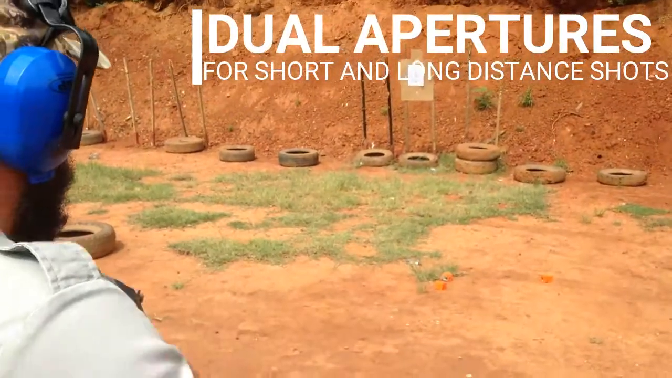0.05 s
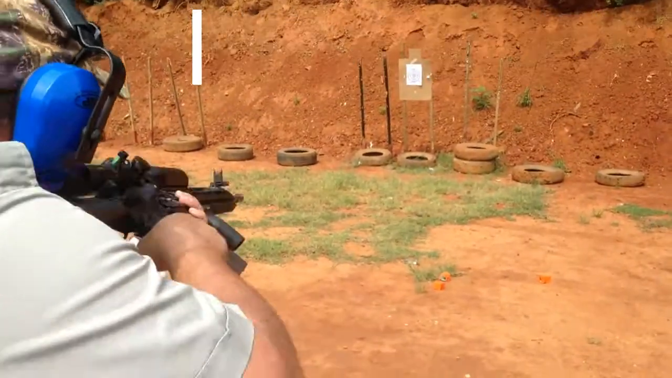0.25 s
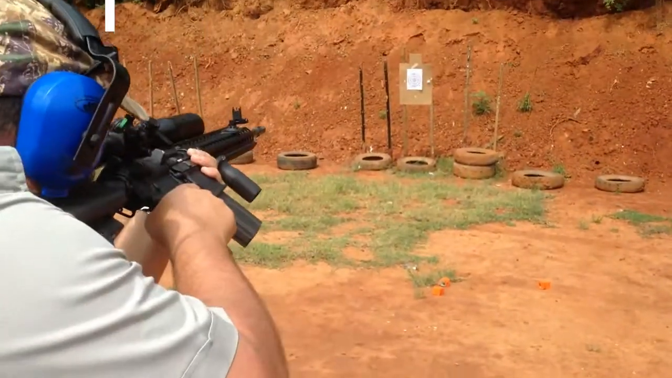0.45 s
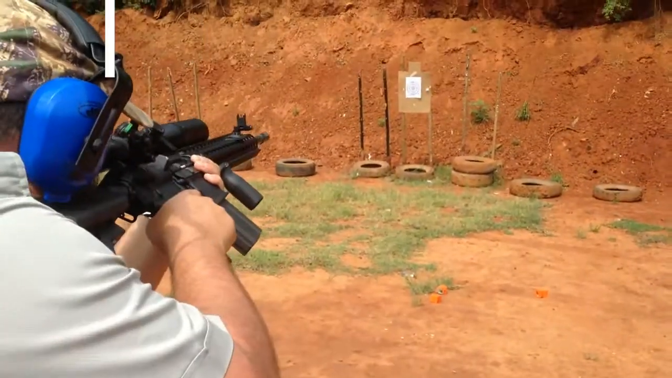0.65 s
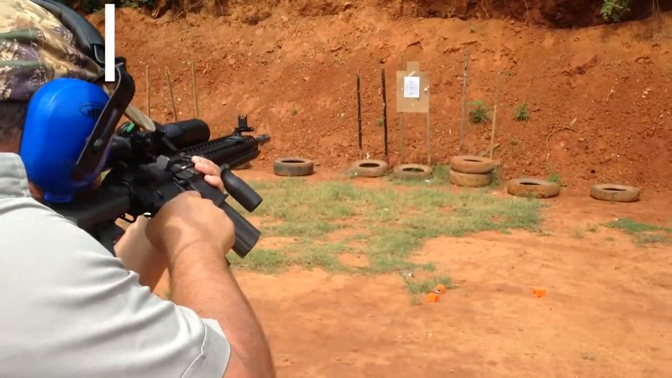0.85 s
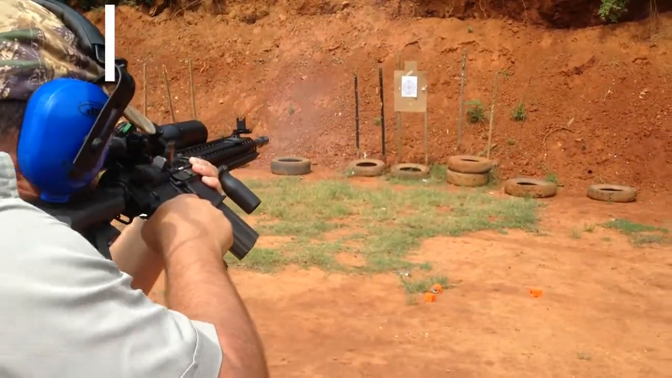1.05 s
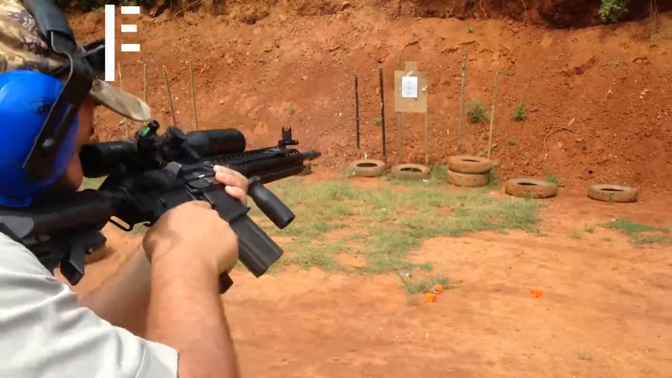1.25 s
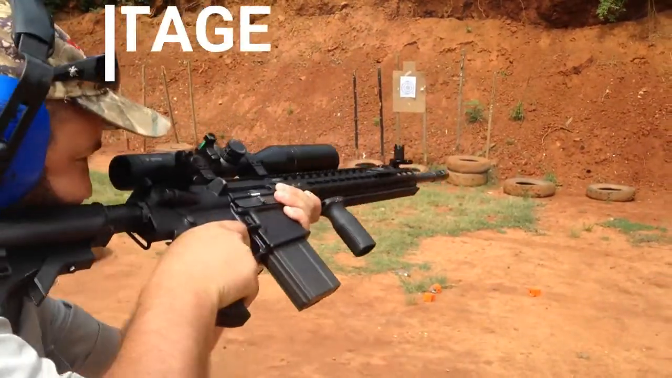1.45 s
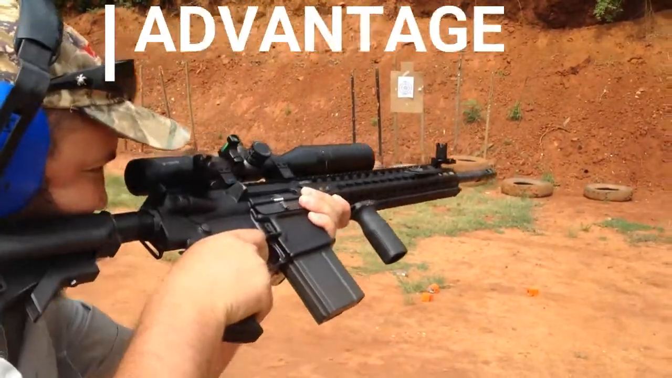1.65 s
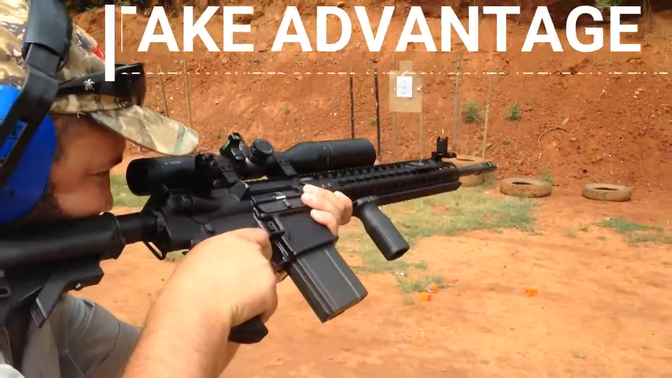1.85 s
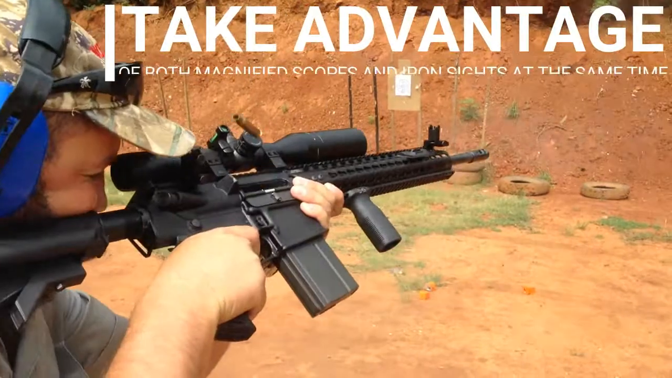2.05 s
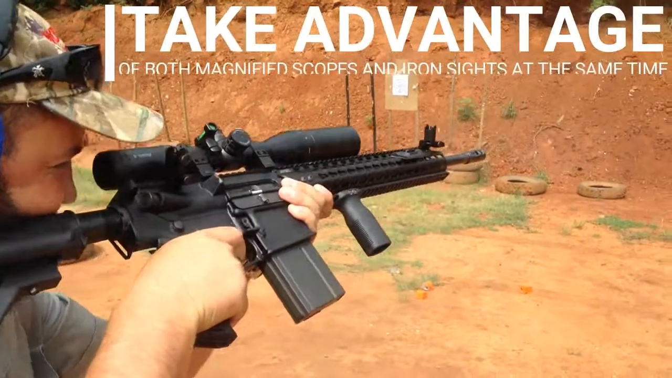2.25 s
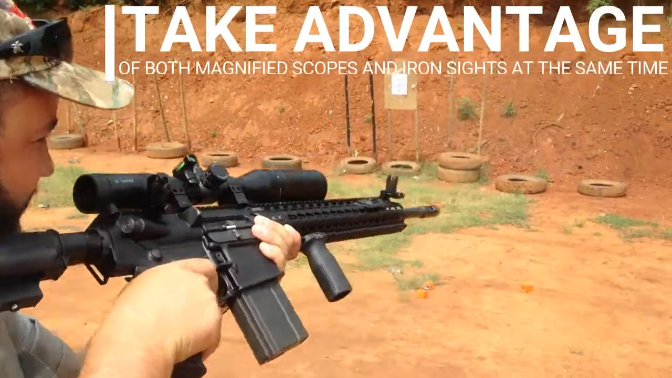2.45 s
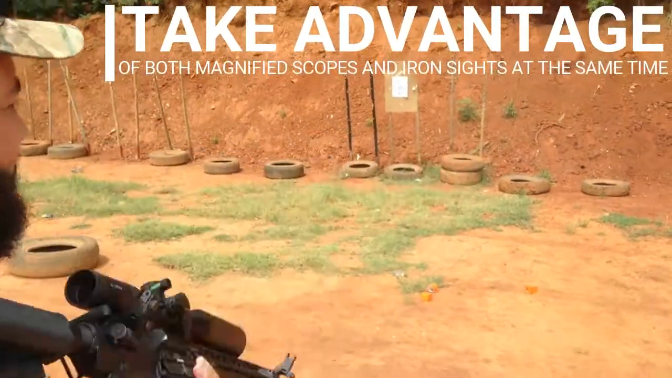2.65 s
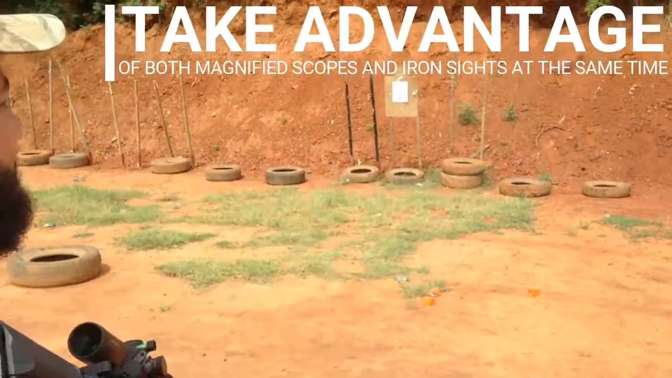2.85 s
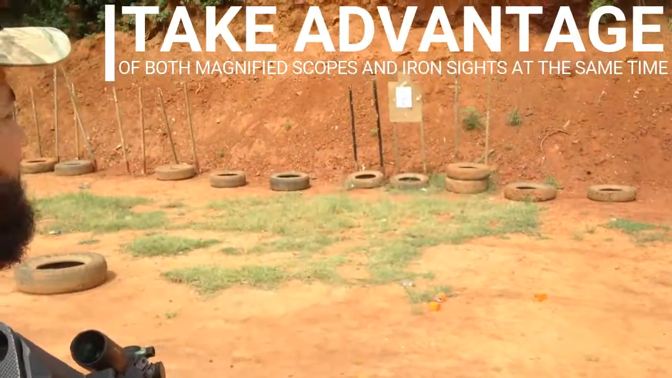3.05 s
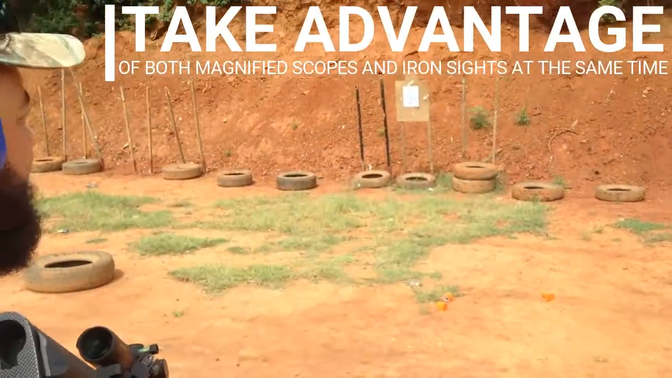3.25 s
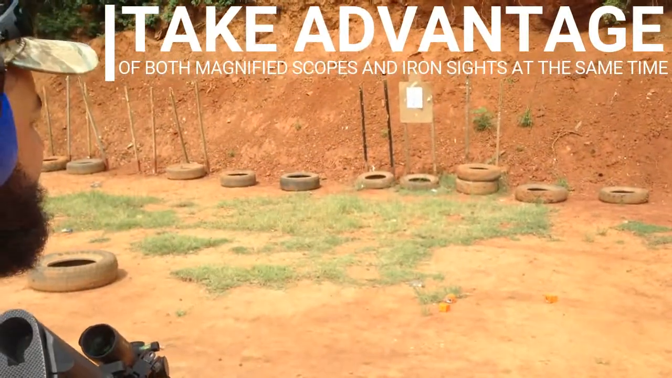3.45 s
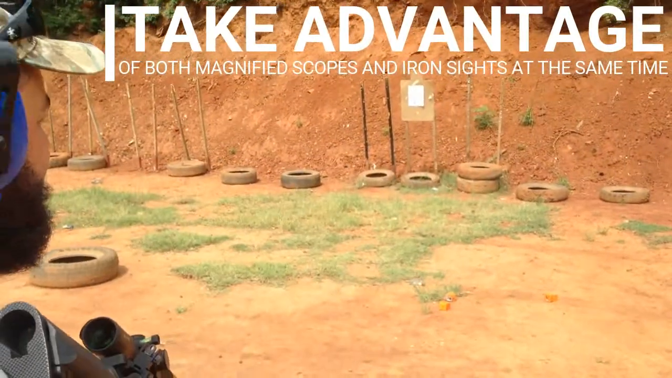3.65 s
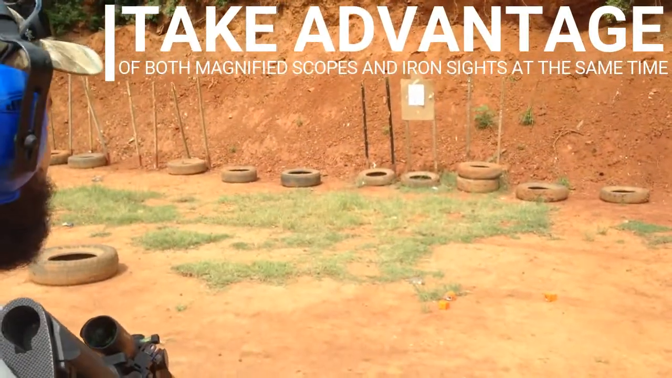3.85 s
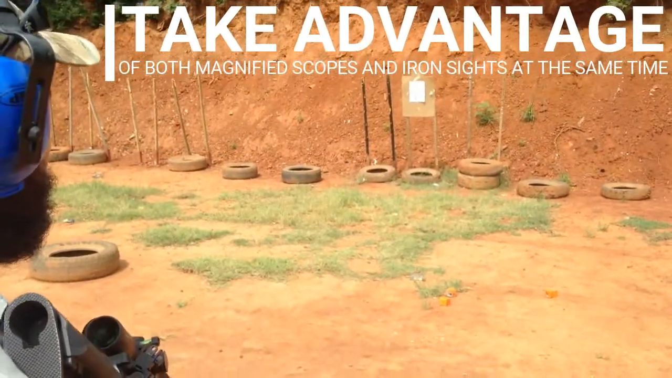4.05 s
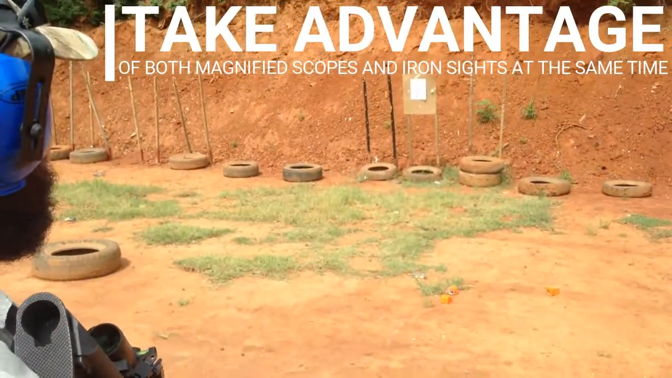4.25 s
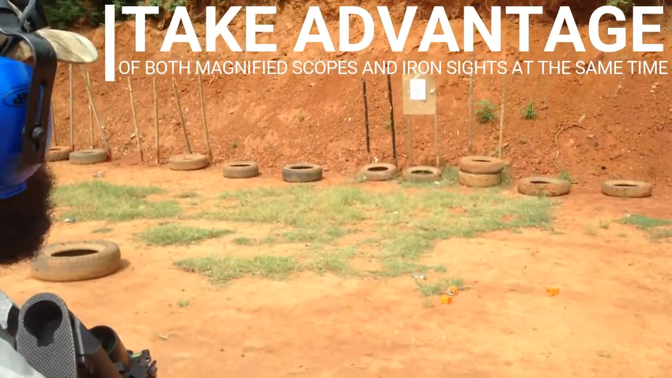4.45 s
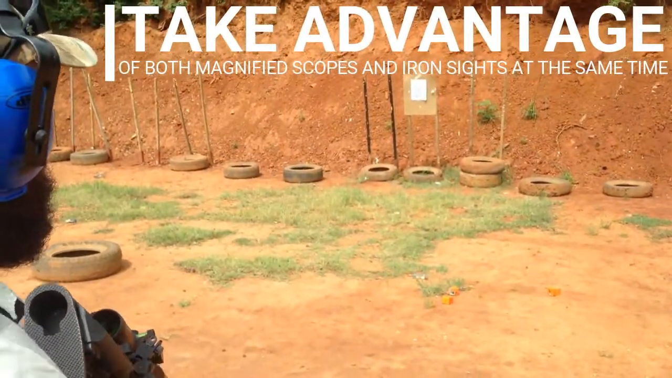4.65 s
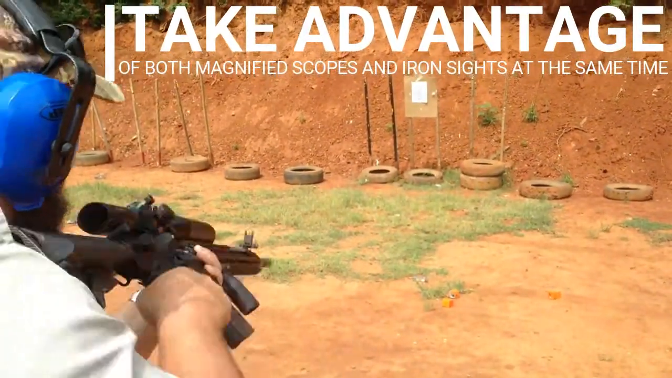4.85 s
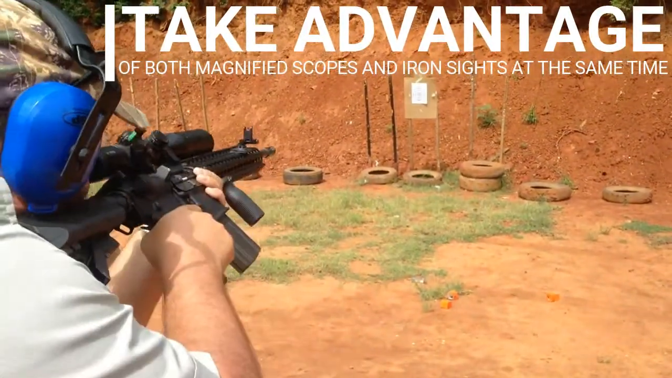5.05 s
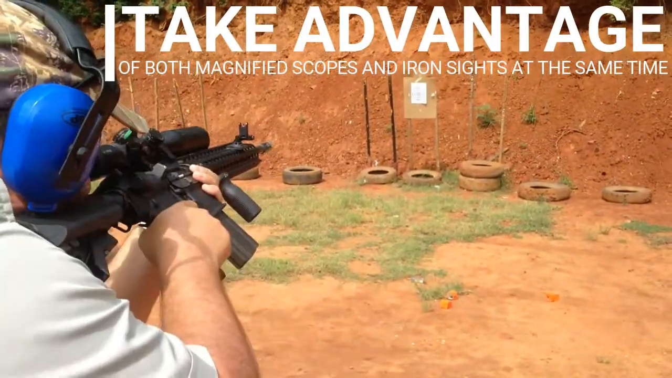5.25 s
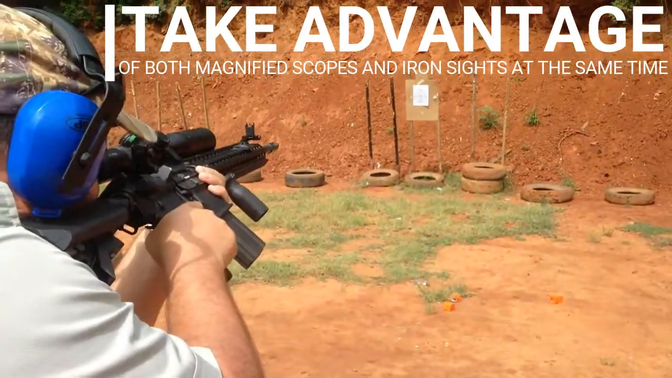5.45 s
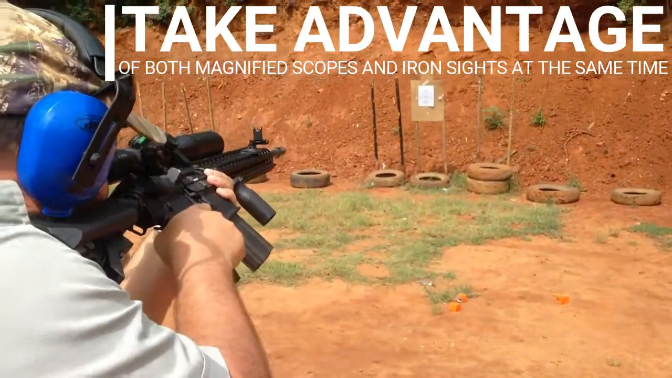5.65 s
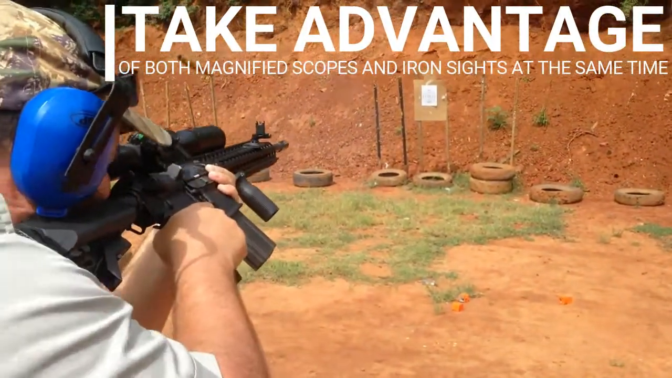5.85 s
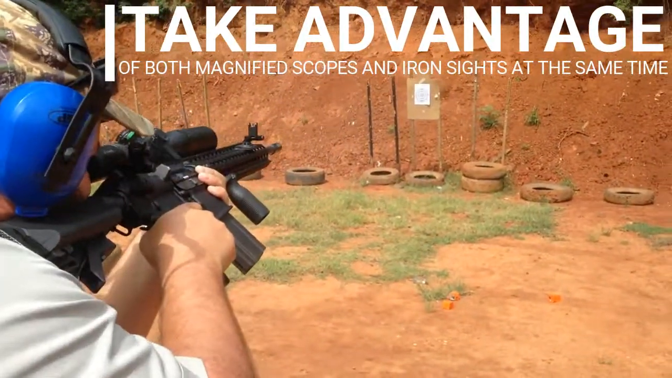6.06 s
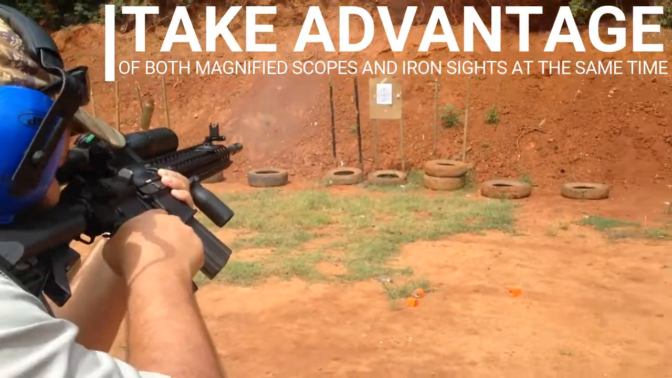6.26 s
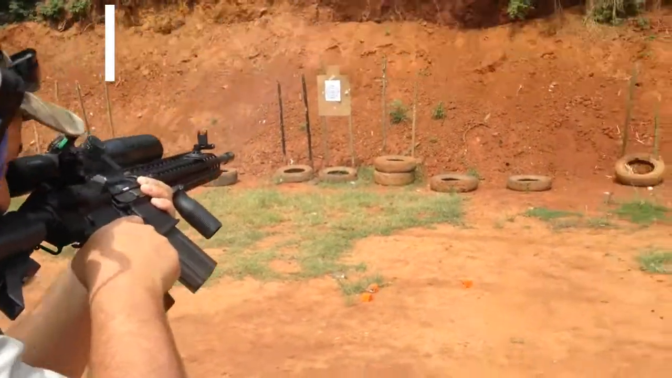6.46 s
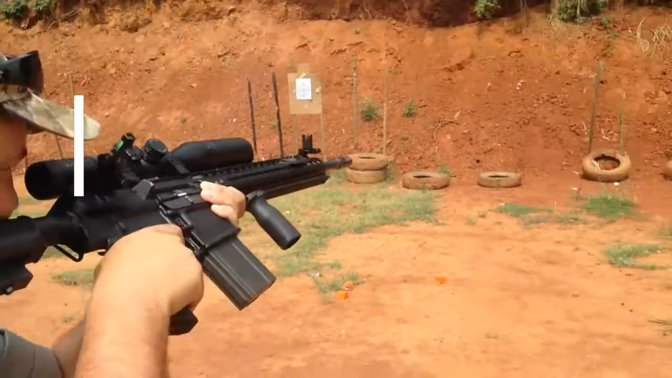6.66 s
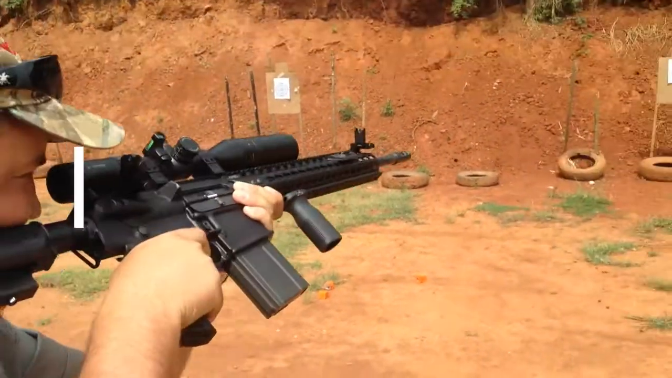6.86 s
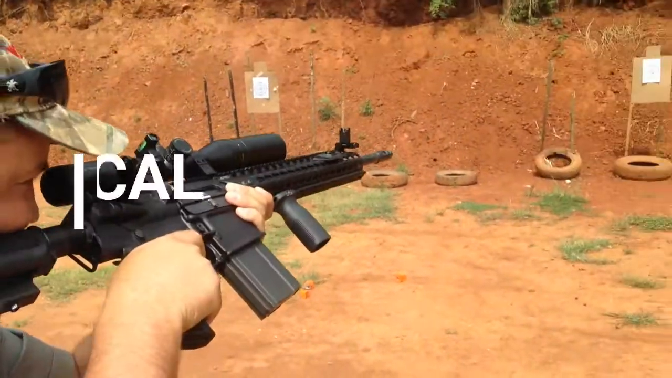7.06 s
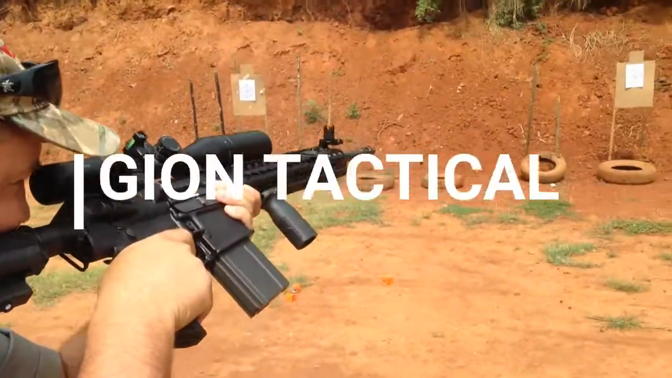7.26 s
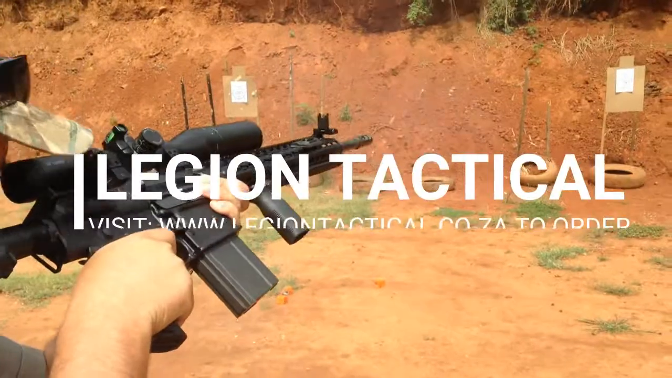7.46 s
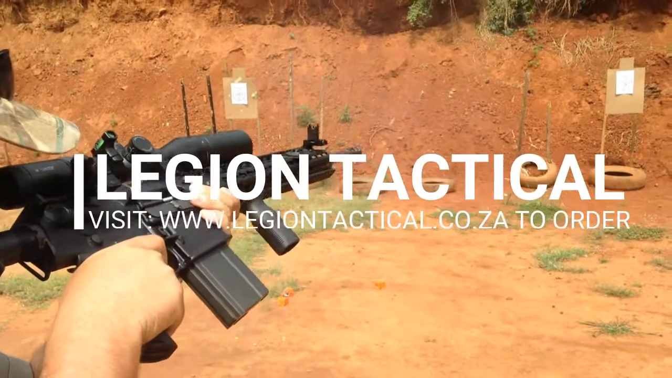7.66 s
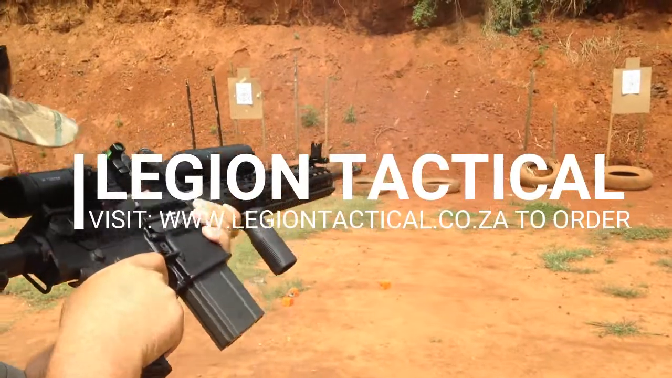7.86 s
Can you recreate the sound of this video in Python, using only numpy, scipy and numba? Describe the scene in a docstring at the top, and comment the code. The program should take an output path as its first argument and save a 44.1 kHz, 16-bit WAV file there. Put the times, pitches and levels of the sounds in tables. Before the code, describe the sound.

At an open-air rifle range ringed by earth banks, heard right beside the shooter, two hard shots crack about a second apart, each followed by a dense splash of reflections and a faint far echo. Ringing brass, heavy knocks, rubbing cloth and wind thumps fill a pause. Then two quick shots follow, and a last one a second later. The overloaded microphone flattens each blast.

```python
"""An outdoor rifle range with earth banks, heard from beside the shooter: steady air and breeze, both filtered noise.
Sleeves rub, the rifle scuffs and clacks (noise bursts), air puffs push the microphone, a far bird whistles (gliding sines).
Five shots follow: a noise crack, dense scatter from the banks and a far echo half a second later.
A limiter flattens the loud beginning of each shot; the scatter and far echo then fade freely.
After the second shot come ringing brass cases (decaying sines), hard knocks, gusts and a soft rush."""
import sys
import numpy as np
from scipy import signal
from scipy.fft import rfft, irfft, next_fast_len
from scipy.io import wavfile
from scipy.ndimage import uniform_filter1d
from numba import njit

SR = 44100
rng = np.random.default_rng(int(sys.argv[2]) if len(sys.argv) > 2 else 0)


def to_wav(sig):
    """Store sig (one row per channel, or 1-D mono) as 16-bit WAV at the path in sys.argv[1].

    Samples outside -1..1 are clipped; the rate is SR.
    """
    pcm = np.clip(np.atleast_2d(sig), -1, 1) * 32767
    pcm = np.round(pcm).astype(np.int16)
    wavfile.write(sys.argv[1], SR, pcm.T)  # frames by channels


N = 348654
TIME = np.arange(N) / SR


def undb(db):
    """Decibels to amplitude gain."""
    return 10 ** (np.asarray(db) / 20)


def over_hz(table, hz):
    """Read a table of (Hz, value) on a log-frequency axis."""
    points_hz, values = np.transpose(table)
    return np.interp(np.log(np.maximum(hz, 1)), np.log(points_hz), values)


def colour(x, spectrum):
    """Give a noise a spectrum, at rms 1; the bass rolls off below the first point."""
    size = next_fast_len(len(x), True)
    hz = np.fft.rfftfreq(size, 1 / SR)
    bass_gain = np.minimum(hz / spectrum[0][0], 1) ** 2
    gain = undb(over_hz(spectrum, hz)) * bass_gain
    y = irfft(rfft(x, size) * gain, size)[:len(x)]
    return y / y.std()


def walk(rate_hz, size):
    """Smooth random wandering with a standard deviation of 1."""
    step = int(SR / rate_hz)
    stairs = np.repeat(rng.standard_normal(size // step + 1), step)
    y = uniform_filter1d(stairs, step)[:size]
    return y / y.std()


def reflections(size, patchy_db=1.5):
    """Dense noise, as of crowded echoes, whose level clusters randomly."""
    return rng.standard_normal(size) * undb(patchy_db * walk(700, size))


def swell(t, start_s, end_s, rise_db_per_s, fall_db_per_s):
    """Gain that rises to 1 at the start, holds until the end and falls away."""
    early_s = np.maximum(start_s - t, 0)
    late_s = np.maximum(t - end_s, 0)
    return undb(-rise_db_per_s * early_s - fall_db_per_s * late_s)


def add(out, s, x):
    """Mix a sound in at a time in seconds."""
    i = int(s * SR)
    out[i:i + len(x)] += x[:len(out) - i]


# Gusts at the microphone. Each row: start in seconds, end in seconds, level in dB.
GUST_TIMES = [(2.75, 4.3, -46), (4.664, 5.4, -50), (5.687, 5.72, -54.5), (7.8, 7.9, -52.5)]
BREEZE_DB, GUST_RISE_DB_PER_S, GUST_FALL_DB_PER_S = -64, 133, 127


def gusts(t):
    """Strength of the wind: a light breeze with gusts on top."""
    strength = undb(BREEZE_DB)
    for start_s, end_s, db in GUST_TIMES:
        strength = strength + undb(db) * swell(t, start_s, end_s, GUST_RISE_DB_PER_S, GUST_FALL_DB_PER_S)
    return strength


# Spectrum of the open air. Each row: frequency in Hz, relative level in dB per Hz.
AIR_SPECTRUM = [(60, -5.5), (130, -11), (250, -11), (380, -11.5), (560, -12.5), (900, -9.5), (2200, -6),
                (3000, -11), (5500, -15), (9000, -22), (15000, -26)]
AIR_DB = -66
# Spectrum of the soft rush. Each row: frequency in Hz, relative level in dB per Hz.
RUSH_SPECTRUM = [(200, -11), (400, 1), (650, 4), (1000, -2.5), (1500, -5), (2200, -8), (3000, -24),
                 (6000, -30), (10000, -33.5), (15000, -42)]
# one swell of rush while the rifle is held low, over a faint remainder
RUSH_START_S, RUSH_END_S, RUSH_DB, RUSH_REST_DB = 3.1, 4.375, -47, -67
RUSH_RISE_DB_PER_S, RUSH_FALL_DB_PER_S = 22.5, 39.5
# Spectrum of the low eddies. Each row: frequency in Hz, relative level in dB per Hz.
EDDY_SPECTRUM = [(30, -14.5), (62, 4), (120, -4.5), (220, -17.5), (400, -34.5), (1500, -70.5), (5000, -91)]


def wind(gusty_db=2.0, flutter_db=1.5):
    """Noise of steady air, low eddies at the microphone that follow the gusts, and a fluttering rush."""
    air = colour(rng.standard_normal(N), AIR_SPECTRUM) * undb(AIR_DB + 0.54 * walk(3.2, N))
    eddies = colour(rng.standard_normal(N), EDDY_SPECTRUM) * gusts(TIME) * undb(gusty_db * walk(12, N))
    rush_swell = swell(TIME, RUSH_START_S, RUSH_END_S, RUSH_RISE_DB_PER_S, RUSH_FALL_DB_PER_S)
    rush_gain = undb(RUSH_REST_DB) + undb(RUSH_DB) * rush_swell
    rush = colour(reflections(N, patchy_db=2), RUSH_SPECTRUM) * rush_gain
    return air + eddies + rush * undb(flutter_db * walk(30, N))


# Spectrum of rubbed cloth. Each row: frequency in Hz, relative level in dB per Hz.
CLOTH_SPECTRUM = [(1500, -7), (3500, -1), (6500, 3), (10000, -4), (15000, -11.5)]
# Movements of the shooter. Each row: start in seconds, end in seconds, level in dB.
ARM_MOVES = [(0.052, .25, -70.5), (1.9, 3.554, -60.5), (4.85, 5.2, -71.5)]
MOVE_RISE_DB_PER_S, MOVE_FALL_DB_PER_S = 39, 35


def sleeves(catch_db=1.0):
    """Cloth hiss that catches and slips: patchy noise under a randomly wandering level."""
    rubbing = np.zeros(N)
    for start_s, end_s, db in ARM_MOVES:
        rubbing += undb(db) * swell(TIME, start_s, end_s, MOVE_RISE_DB_PER_S, MOVE_FALL_DB_PER_S)
    hiss = colour(reflections(N, patchy_db=2.5), CLOTH_SPECTRUM)
    return hiss * rubbing * undb(catch_db * walk(45, N))


def contact(db, centre_hz, octaves, decay_s):
    """A short contact: a decaying noise burst in one broad resonance."""
    t = TIME[:SR // 5]
    hz = np.maximum(np.fft.rfftfreq(len(t), 1 / SR), 1)
    resonance = 1 / (1 + (np.log2(hz / centre_hz) / octaves) ** 4)
    body = irfft(rfft(rng.standard_normal(len(t))) * resonance, len(t))
    return undb(db) * .5 * body / body.std() * np.exp(-t / decay_s)


# Rifle against clothing. Each row: time in seconds, level in dB, centre in Hz, decay in seconds.
CLOTHING_SCUFFS = [(.17, -51.5, 2180, .04), (3.09, -26, 624, 0.012), (3.141, -32.5, 726, .014),
                   (3.42, -28.5, 645, 0.031), (4.056, -35, 603, 0.06), (4.73, -46, 1420, 0.046)]
SCUFF_OCTAVES = 0.5
# Clacks of the rifle's parts. Each row: time in seconds, level in dB, centre in Hz.
RIFLE_CLACKS = [(.27, -41, 1480), (2.328, -12.5, 4900), (2.6456, -8.5, 1200), (2.663, -17.5, 3950),
                (3.513, -25.5, 1640), (3.763, -38, 895), (4.025, -38, 1860), (4.773, -36, 2100),
                (4.881, -43, 2300), (7.375, -12.5, 1420)]
CLACK_OCTAVES, CLACK_DECAY_S = 0.72, 0.0031
# A case skipping over grit. Each row: time in seconds, level in dB.
GRIT_TICKS = [(3.512, -24), (3.639, -33.5), (3.818, -38), (4.181, -42)]
TICK_HZ, TICK_OCTAVES, TICK_DECAY_S = 5300, .48, 0.0017


def clicks():
    """The rifle scuffs against clothing, its parts clack and a case skips over grit: short noise contacts."""
    out = np.zeros(N)
    for s, db, hz, decay_s in CLOTHING_SCUFFS:
        add(out, s, contact(db, hz, SCUFF_OCTAVES, decay_s))
    for s, db, hz in RIFLE_CLACKS:
        add(out, s, contact(db, hz, CLACK_OCTAVES, CLACK_DECAY_S))
    for s, db in GRIT_TICKS:
        add(out, s, contact(db, TICK_HZ, TICK_OCTAVES, TICK_DECAY_S))
    return out


# Hardest knocks and puffs on the microphone. Each row: time in seconds, push peak in dB, frequency in Hz.
HARD_BUMPS = [(2.6458, -10, 603), (2.65, -5, 437), (2.78, -20, 128), (2.793, -17.5, 147),
              (2.953, -21.5, 132), (2.985, -25.5, 80), (3.214, -19, 113), (3.831, -21.5, 120),
              (3.84, -21, 260), (4.098, -28, 148), (4.118, -23, 110), (4.236, -20, 158), (4.33, -26, 99.5),
              (4.714, -34, 110), (4.91, -33, 101), (4.965, -31, 79.6)]
# lighter puffs come by chance and grow with the gusts
PUFFS_PER_S, PUFF_HZ, PUFF_OVER_GUST_DB = 9.7, 123, 7.5
# Spectrum of scuffing on the microphone. Each row: frequency in Hz, relative level in dB per Hz.
MIC_SCUFF_SPECTRUM = [(90, -2.5), (250, 2.5), (450, -15), (1000, -30), (5000, -53)]


def bumps(scuff_db=-13, scuff_s=0.0055, scatter_db=6.0, scatter_octaves=0.21):
    """A single push on the diaphragm with a swing back on either side, and a little scuffing around it."""
    out = np.zeros(N)
    t = TIME[:SR // 5] - .1
    pushes = [(s, undb(db), hz) for s, db, hz in HARD_BUMPS]
    slots_s = np.arange(.2, TIME[-1], 1 / PUFFS_PER_S)
    for s in slots_s + rng.random(len(slots_s)) / PUFFS_PER_S:
        if s < TIME[-1]:
            size = gusts(s) * undb(PUFF_OVER_GUST_DB + scatter_db * rng.normal())
            pushes.append((s, size, PUFF_HZ * 2 ** (scatter_octaves * rng.normal())))
    for s, size, hz in pushes:
        scuff = colour(rng.standard_normal(len(t)), MIC_SCUFF_SPECTRUM) * np.exp(-abs(t) / scuff_s)
        u = (np.pi * hz * t) ** 2
        push = (2 * u - 1) * np.exp(-np.minimum(u, 50))
        add(out, s + t[0], size * (push + undb(scuff_db) * scuff))
    return out


# Bird whistles. Each row: start in seconds, length in seconds, start, middle and end pitch in Hz, level in dB.
BIRD_WHISTLES = [(.75, .12, 3700, 3930, 3580, -71), (4.514, 0.2, 5500, 4950, 4630, -73),
                 (4.95, 0.076, 3700, 3350, 3050, -65), (5.157, 0.11, 5060, 3950, 3030, -68)]


def bird(waver_db=3.0):
    """Thin whistles from the trees: sines gliding along a parabola in pitch, wavering in strength."""
    out = np.zeros(N)
    for s, length_s, *pitches_hz, db in BIRD_WHISTLES:
        u = np.linspace(0, 1, int(length_s * SR))
        hz = np.polyval(np.polyfit([0, .5, 1], pitches_hz, 2), u)
        envelope = np.sqrt(abs(np.sin(np.pi * u)))
        add(out, s, undb(db) * envelope * np.sin(2 * np.pi * np.cumsum(hz) / SR))
    return out * undb(waver_db * walk(60, N))


def die_away(x, t60_table):
    """Let every octave of a sound fade at its own rate."""
    hz = np.fft.rfftfreq(len(x), 1 / SR)
    t, whole = TIME[:len(x)], rfft(x)
    octave = np.log2(np.clip(hz, 32, 16384))
    out = np.zeros(len(x))
    for k in range(5, 15):
        band = irfft(whole * np.maximum(1 - abs(octave - k), 0), len(x))
        out += band * np.exp(-np.log(1000) * t / over_hz(t60_table, 2 ** k))
    return out


# Bands stressed by the hollow of the range. Each row: centre in Hz, width in Hz, boost in dB.
HOLLOW_BANDS = [(304, 23, 1), (450, 39, 2.5), (515.4, 46, 4), (586, 91, 2.5), (778, 37, 6), (1070, 77, 1),
                (2170, 81, 1)]


def hollow(x):
    """Stress the bands in which the earth banks ring."""
    hz = np.fft.rfftfreq(len(x), 1 / SR)
    boost_db = sum(db / (1 + (2 * (hz - centre) / width) ** 2) for centre, width, db in HOLLOW_BANDS)
    return irfft(rfft(x) * undb(boost_db), len(x))


# Shots. Each row: time in seconds, gain of crack and banks in dB, gain of far echo in dB.
RIFLE_SHOTS = [(1.1105, 4.5, -1), (2.079, 5, -0.5), (5.854, 4.5, 0), (6.2948, 3.5, -1), (7.405, 5, -0.5)]
# Spectra of crack, banks, far echo and the faint noise before them.
# Each row: frequency in Hz, relative level in dB per Hz.
CRACK_SPECTRUM = [(30, -22), (70, -12.5), (200, -7.5), (550, 3), (1000, -3), (2200, 4), (3000, -4.5),
                  (5000, -6), (8000, -8.5), (11000, -14.5), (15000, -13)]
BANKS_SPECTRUM = [(25, -23.5), (45, -11), (100, -11.5), (170, -8.5), (370, -6.5), (540, -0.5), (800, -3.5),
                  (1300, -7), (2200, -7), (2900, -15.5), (4500, -17.5), (7000, -18), (10000, -25),
                  (15000, -32)]
FAR_SPECTRUM = [(30, -26.5), (90, -5.5), (170, 0), (330, 0), (540, -2), (900, -3.5), (1500, -5.5),
                (2200, -7), (3000, -15), (4500, -18.5), (7000, -26.5), (10000, -40.5), (14000, -58.5)]
FAINT_NOISE_SPECTRUM = [(30, 0.5), (100, -6), (180, -2.5), (480, -0.5), (900, -13.5), (1500, -15),
                        (2900, -8.5), (4000, -24), (7000, -25.5), (10000, -35.5), (15000, -35.5)]
# Decay of scatter from the banks. Each row: frequency in Hz, time to fall 60 dB in seconds.
BANKS_T60 = [(50, 0.23), (200, 0.39), (600, 0.27), (3000, .36), (7000, 0.34), (14000, 0.22)]
# Echoes from distant hillsides. Each row: delay in seconds, level in dB.
HILL_ECHOES = [(.5, -27), (0.689, -43), (1.059, -46)]
HILL_RISE_DB_PER_S, HILL_FALL_DB_PER_S = 60.5, 86


def shots(crack_db=20, crack_s=0.02, banks_db=14, build_s=0.0029, faint_db=-24, faint_rise_s=.009,
          shared_power=0.34, lumpy_db=0.5):
    """Muzzle blast, scatter from the earth banks and far echo; part of the echo noise is common to all shots."""
    out, t = np.zeros(N), TIME[:2 * SR]
    ground = reflections(len(t))
    hills = np.zeros(len(t))
    for delay_s, db in HILL_ECHOES:
        hills += undb(db) * swell(t, delay_s, delay_s, HILL_RISE_DB_PER_S, HILL_FALL_DB_PER_S)
    roll = hills * undb(lumpy_db * walk(60, len(t)))
    burst = 1 / (1 + (t / crack_s) ** 6)
    build = 1 - np.exp(-t / build_s)
    before = TIME[:int(.023 * SR)]
    for s, db, far_db in RIFLE_SHOTS:
        own = reflections(len(t))
        echoes = hollow(np.sqrt(shared_power) * ground + np.sqrt(1 - shared_power) * own)
        # blast and ground bounce merge into one harsh burst
        crack = undb(crack_db) * colour(rng.standard_normal(len(t)), CRACK_SPECTRUM) * burst
        banks = undb(banks_db) * die_away(colour(echoes, BANKS_SPECTRUM), BANKS_T60) * build
        far = undb(far_db) * colour(echoes, FAR_SPECTRUM) * roll
        add(out, s, undb(db) * (crack + banks) + far)
        # a 23 ms swell of faint filtered noise ends where the crack begins
        faint = colour(rng.standard_normal(len(t)), FAINT_NOISE_SPECTRUM)[:len(before)]
        add(out, s - before[-1], undb(faint_db) * faint * (1 - np.exp(-(before / faint_rise_s) ** 2)))
    return out


# Modes of a spent case. Each row: place from lowest (0) to highest mode (1), level in dB,
# time to fall 60 dB in seconds.
BRASS_MODES = [(-.03, -13, 0.36), (0, -2.5, 0.25), (.61, -15, .32), (1, -4.5, 0.21)]
# Cases landing and bouncing. Each row: time in seconds, ring level in dB, lowest mode in Hz,
# highest mode in Hz, brightness in dB per octave.
CASE_LANDINGS = [(2.573, -40, 9780, 14310, 0), (2.594, -29.5, 9780, 14310, -3),
                 (3.175, -57, 9780, 14310, 5.5), (3.512, -42.5, 10230, 14760, 30),
                 (6.821, -51.5, 9300, 14000, 9), (6.975, -52, 9300, 14260, -10),
                 (7.235, -56.5, 9270, 14260, -1)]


def cases(contact_s=0.001, tumble_db=4.0):
    """Brass modes as decaying sines; the spot on which a case lands favours high or low modes."""
    out, t = np.zeros(N), TIME[:SR // 2]
    for s, db, low_hz, high_hz, bright_db in CASE_LANDINGS:
        for place, mode_db, t60_s in BRASS_MODES:
            hz = low_hz + place * (high_hz - low_hz)
            tilt_db = bright_db * np.log2(2 * hz / (low_hz + high_hz))
            ring = np.sin(2 * np.pi * hz * t) * np.exp(-np.log(1000) * t / t60_s)
            onset = 1 - np.exp(-t / contact_s)
            # each mode swells and dips as the case tumbles
            tumble = undb(tumble_db * walk(59, len(t)))
            add(out, s, undb(db + mode_db + tilt_db) * ring * onset * tumble)
    return out


def scene():
    """Everything that is mixed ahead of the limiter."""
    return (wind() + sleeves() + clicks() + bumps() + bird() + shots() + cases())[None]


@njit
def follow_level(x, attack, release):
    """Level detector that rises fast and falls more slowly."""
    y, level = np.empty(len(x)), 0.
    for i in range(len(x)):
        rate = attack if abs(x[i]) > level else release
        level += (abs(x[i]) - level) * rate
        y[i] = level
    return y


TOP_HZ = 15500


def record(dry, limit_db=-4.5, attack_s=0.00046, release_s=0.01):
    """A look-ahead limiter flattens what exceeds its limit, the last peaks are rounded and the top is cut."""
    level = follow_level(dry[0], 1 / (attack_s * SR), 1 / (release_s * SR))
    ahead = np.roll(level, -int(.001 * SR))
    held = dry * np.minimum(1, undb(limit_db) / (ahead + 1e-9))
    rounded = held / (1 + held ** 6) ** (1 / 6)
    top_cut = signal.ellip(10, .2, 90, TOP_HZ, fs=SR, output="sos")
    return signal.sosfilt(top_cut, rounded)


dry = scene()
out = record(dry)
to_wav(out)
```